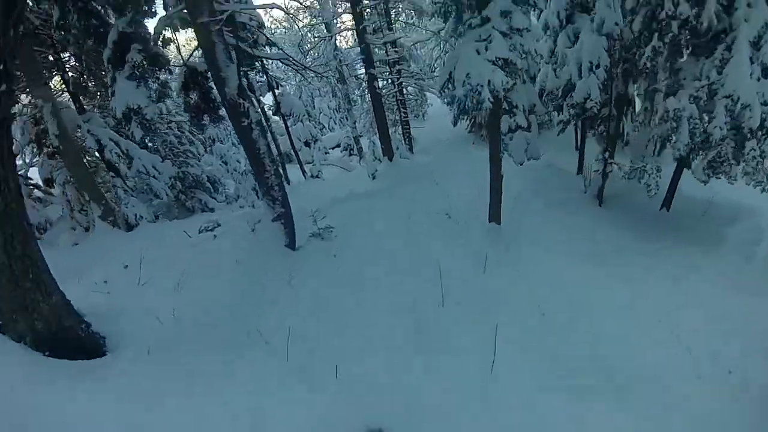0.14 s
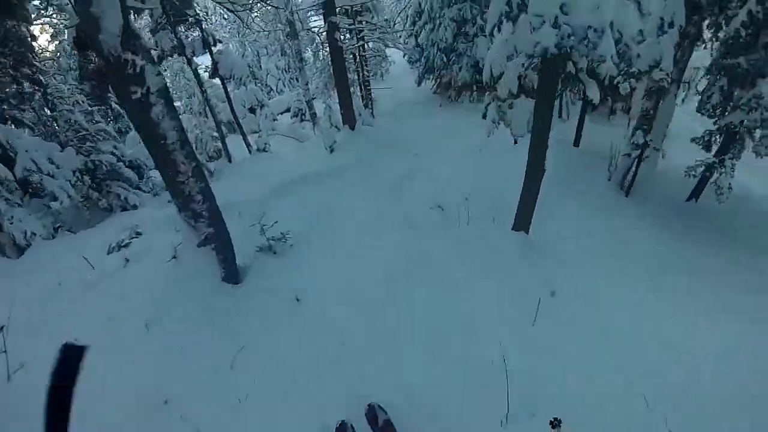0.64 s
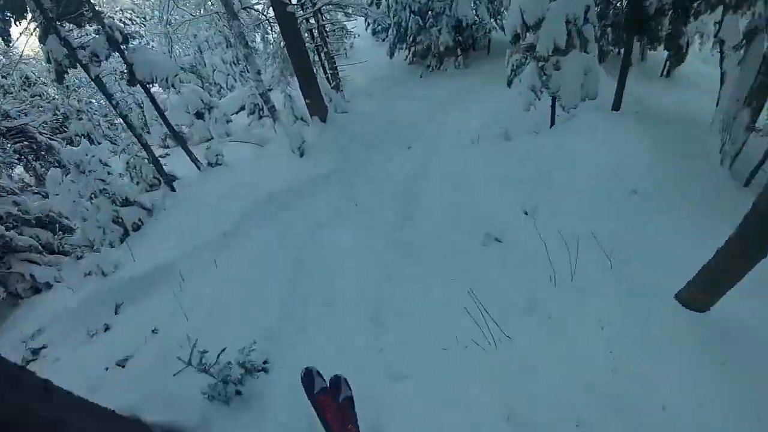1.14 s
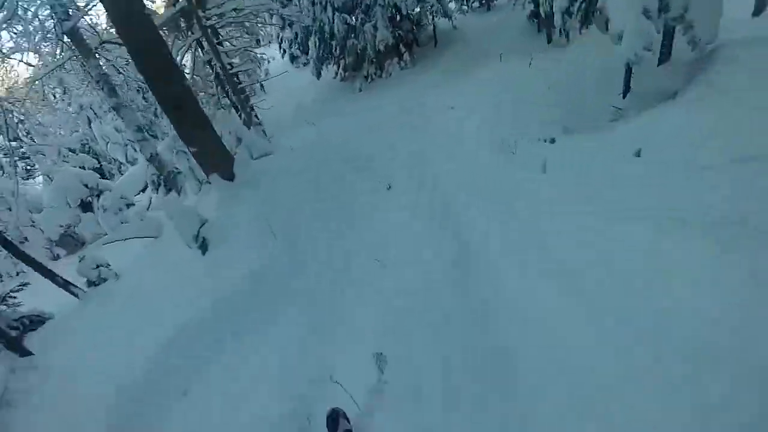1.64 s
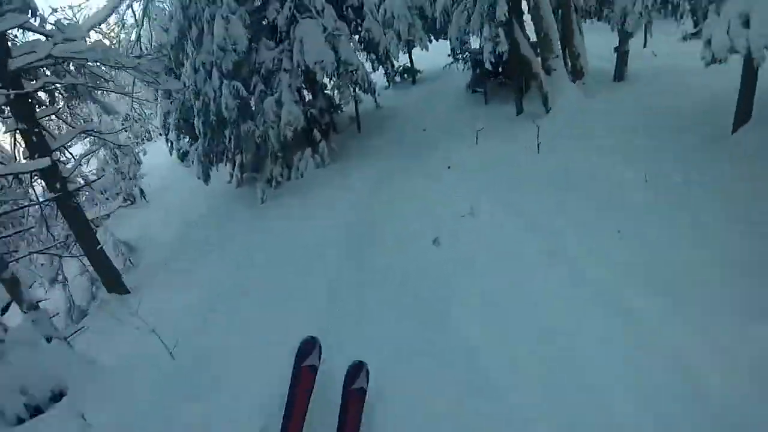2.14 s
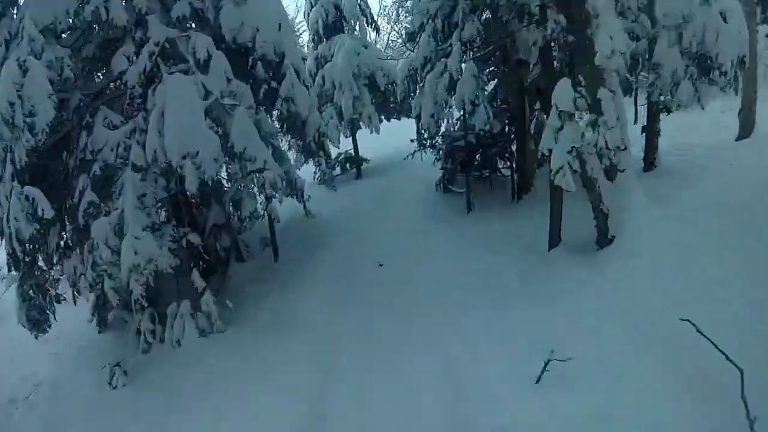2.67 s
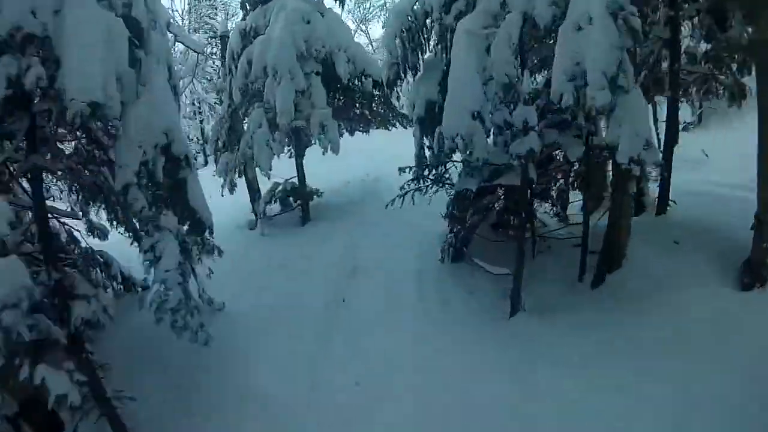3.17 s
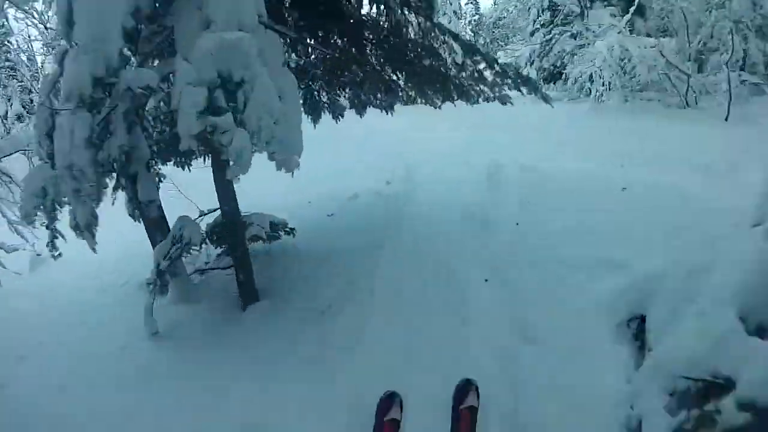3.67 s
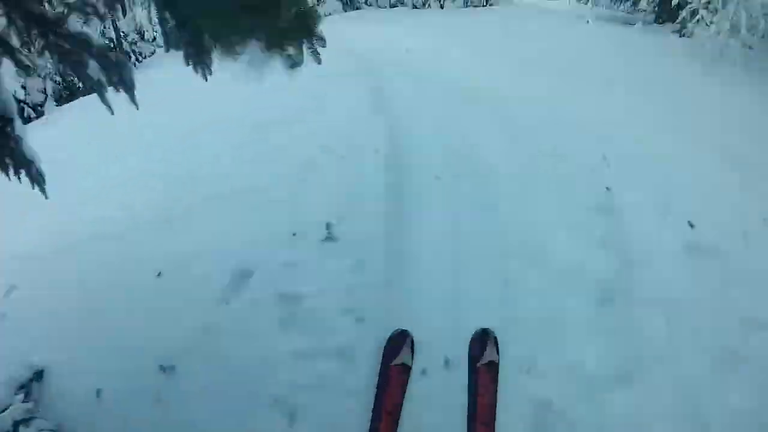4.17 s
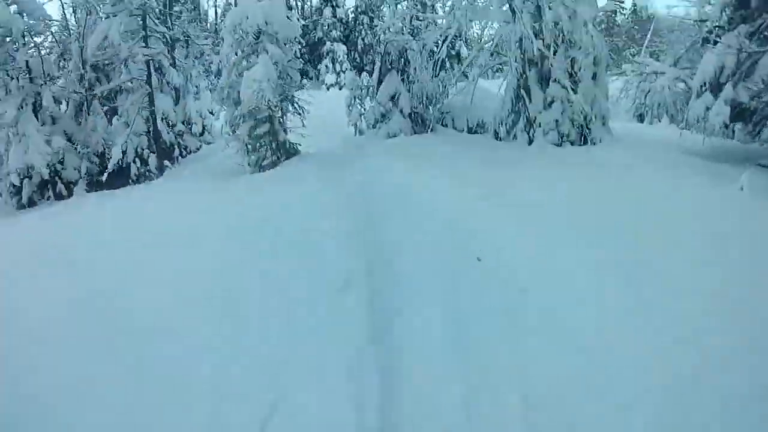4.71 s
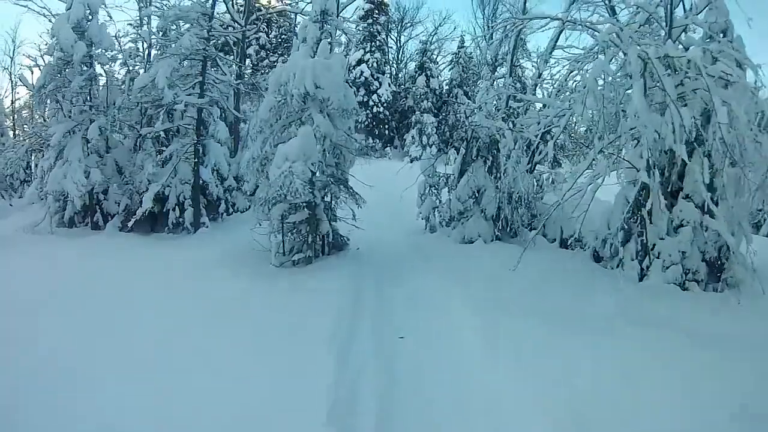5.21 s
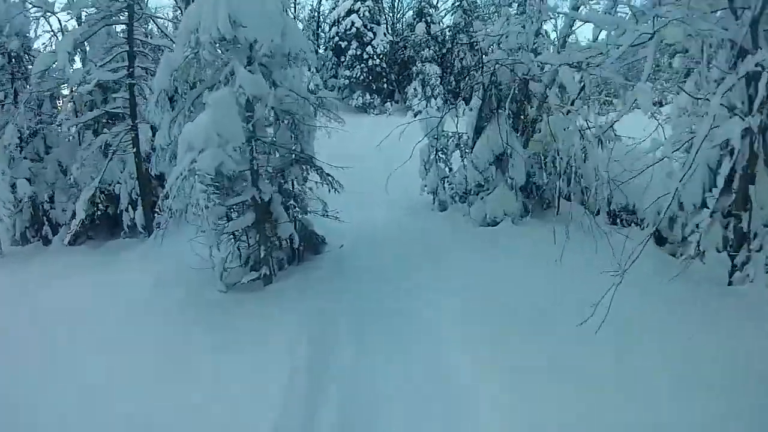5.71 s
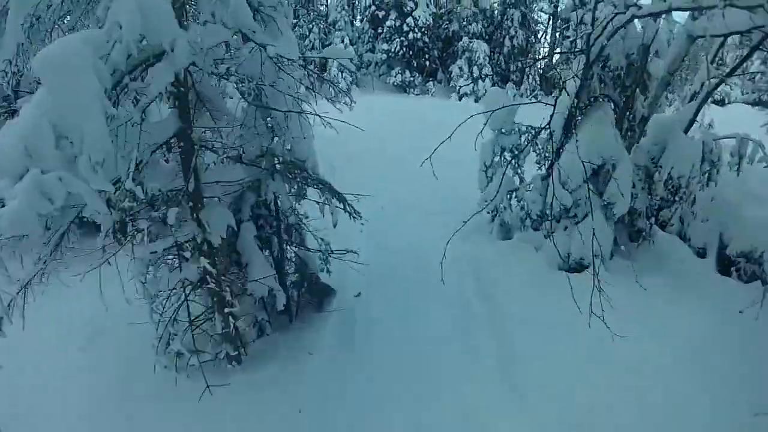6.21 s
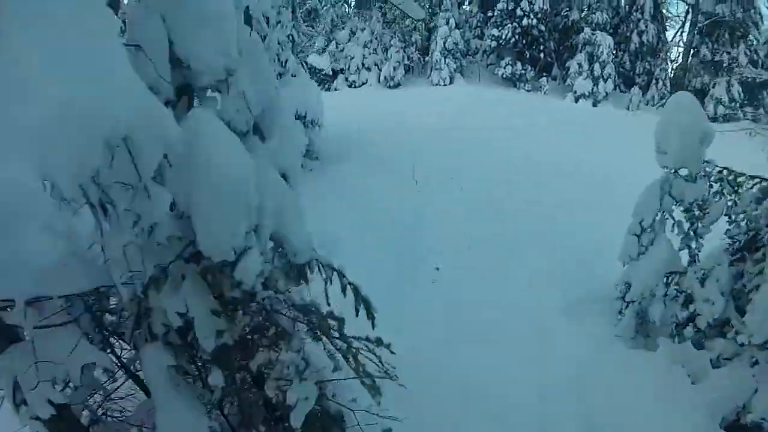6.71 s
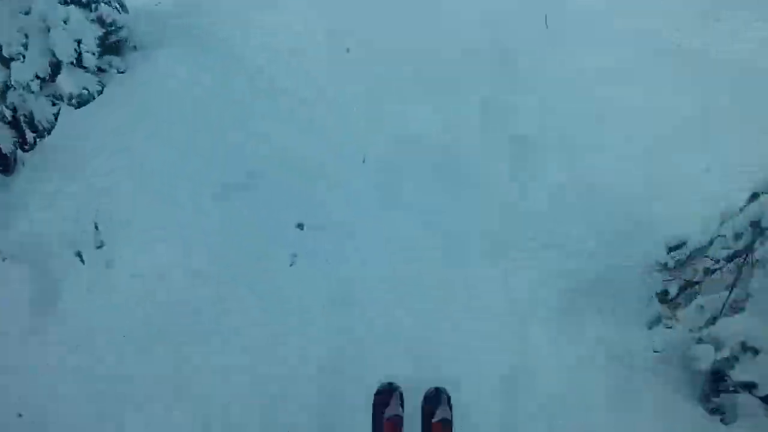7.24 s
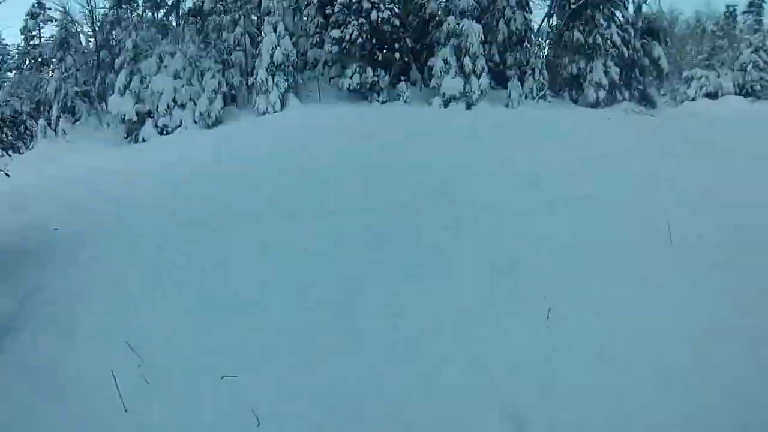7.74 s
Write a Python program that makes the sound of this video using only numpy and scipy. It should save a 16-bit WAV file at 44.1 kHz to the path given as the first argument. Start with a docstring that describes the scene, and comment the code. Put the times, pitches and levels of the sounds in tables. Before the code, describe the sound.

Skis glide through powder with a faint muffled rush, twigs knock and brush a plastic case, then violent cracks and a metallic pole ring burst out.

```python
"""First a muffled rush of powder snow and air, slow pressure swings under it, and twigs brushing past at once.
The place is deep snow between trees, on a gliding skier; the microphone sits in a sealed plastic case on a
springy mount. Shaped noise makes the rush, brushes and swings; bursts through the shell's resonances make the
knocks, each with a push that sets the mount bouncing. Decaying sines make short pitched rings and a metal pole
struck three times; the hard blows overload the inputs."""
import sys
import numpy as np
from scipy import signal
from scipy.io import wavfile
from scipy.ndimage import uniform_filter1d

SR = 44100
rng = np.random.default_rng(int(sys.argv[2]) if len(sys.argv) > 2 else 0)


def file_out(sig):
    """Save sig as 16-bit WAV at sys.argv[1]."""
    # one column per channel
    cols = np.atleast_2d(sig).T
    # limit, then scale
    lim = np.clip(cols, -1, 1)
    pcm = np.round(lim * 32767).astype(np.int16)
    wavfile.write(sys.argv[1], SR, pcm)


def linear_from_db(decibels):
    """Turn decibels (scalar or array-like) into linear amplitude factors; 0 gives 1."""
    return 10 ** (np.asarray(decibels, float) / 20)


N = 346626

# Body of the skier. Each row: time in seconds, slow pressure swing in dB, mount shaking in dB.
BODY_MOTION = [(0.0, -15.5, -52), (0.13, -40, -52), (0.26, -19.5, -55), (0.44, -24.5, -56.5),
               (0.9, -33, -52.5), (1.4, -26.5, -47.5), (1.58, -14.5, -39.5), (1.86, -27.5, -46.5),
               (2.08, -14.5, -37), (2.32, -38, -42.5), (2.54, -26, -46), (2.74, -33.5, -46),
               (3.0, -28, -51), (3.37, -38, -53.5), (3.46, -25, -49.5), (3.59, -40, -51),
               (3.72, -22.5, -52.5), (4.05, -33.5, -52), (5.58, -35.5, -56), (5.95, -29, -52),
               (6.55, -46.5, -57), (6.89, -37, -37), (7.35, -16, -50.5), (7.51, -31.5, -53.5),
               (7.57, -18, -52.5), (7.86, -37.5, -51.5)]
# Skis pressing through powder. Each row: time in seconds, glide in dB (only its change about the mean is used).
SKI_GLIDE = [(0.0, -61.5), (0.68, -66.5), (2.01, -55.5), (3.24, -61.5), (3.59, -54.5), (4.03, -56),
             (4.51, -68), (4.82, -66.5), (5.03, -61.5), (5.39, -68.5), (5.71, -69), (5.84, -60.5),
             (6.19, -67), (6.48, -66.5), (6.67, -64.5), (6.83, -55.5), (7.05, -51), (7.22, -57),
             (7.57, -61.5), (7.86, -62.5)]
# Lower shell ring, upper ring, dull and bright part of the rush. Each row: level in dB at mean glide and shaking,
# share of the glide's swing (dB per dB), share of the shaking's swing (dB per dB).
RUSH_MIX = [(-64.5, 1.1, 0.01), (-66.5, 1.1, 0.01), (-63, 0.42, 0.46), (-69.5, 0.56, 0.01)]
# Lower ring of the plastic shell. Each row: frequency in Hz, width in Hz, level in dB.
SHELL_LOWER_RING = [(1383, 230, 11), (1716, 240, -9)]
# Upper ring of the shell. Each row: frequency in Hz, width in Hz, level in dB.
SHELL_UPPER_RING = [(2041, 200, 12), (2610, 380, -0.5)]
# Thin treble through the shell. Each row: frequency in Hz, width in Hz, level in dB.
SHELL_TREBLE = [(3270, 920, 6), (4700, 2250, 7), (5440, 1400, 9), (6920, 1500, 3.5), (8270, 2600, 1),
                (10940, 1000, -1.5)]
# Cancellations between shell modes. Each row: frequency in Hz, width in Hz, share taken out.
SHELL_CANCELLATIONS = [(1070, 330, 0.3), (3040, 180, 0.38)]
# Place of contact on the shell. Each row: time in seconds, lift of the upper ring in dB.
CONTACT_PLACE = [(0, -2), (1.33, 1), (1.54, -2.5), (1.98, 2), (2.2, 0), (3.67, -5), (3.75, -2), (5.1, -0.1),
                 (5.75, 1.5), (5.9, -8.5), (5.945, 4.5), (6.01, -7), (6.63, -4), (6.66, -4), (6.7, 0.5),
                 (6.82, 1), (6.88, 5), (6.96, 1.5), (7.0, -2.5), (7.03, 0.5), (7.07, -1), (7.1, 3),
                 (7.86, 1.5)]
# Twigs and snow brushing past. Each row: start in seconds, end in seconds, shell level in dB before the swell,
# dull part in dB re shell, treble in dB re shell.
BRUSHES = [(-0.02, 0.08, -45, -3, -17), (0.274, 0.352, -55.5, -7, -12.5), (0.56, 0.616, -67.5, -20, 9),
           (0.81, 0.865, -63.5, 7, -2.5), (1.312, 1.335, -50.5, 0, -6), (1.33, 1.378, -48, -0.5, -10.5),
           (1.399, 1.462, -58.5, 0, -12.5), (1.465, 1.51, -57.5, -3, -1), (1.548, 1.587, -57.5, 8.5, -28),
           (1.762, 1.777, -63, 21, 4), (1.827, 1.881, -53.5, 4.5, -4), (1.986, 2.066, -50.5, 5, -4.5),
           (2.065, 2.105, -71, 25, -22.5), (3.645, 3.67, -54, -2, -12), (3.676, 3.706, -42, 0, -11),
           (3.704, 3.73, -41.5, 0, -12), (3.738, 3.785, -48, 2, -18), (3.997, 4.037, -55.5, -12.5, -26),
           (4.204, 4.228, -23, -12, -0.5), (4.224, 4.246, -30.5, -22, -0.5),
           (4.868, 5.027, -63.5, -10.5, -15.5), (5.776, 5.895, -69, 3.5, -12),
           (5.88, 5.915, -59.5, -11.5, -17), (5.983, 6.047, -55.5, -7.5, -13),
           (6.625, 6.677, -37, -5, -6.5), (6.705, 6.74, -58, 14, -25.5), (6.862, 6.882, -52.5, -10, -14.5),
           (6.88, 6.917, -58, -26, -11.5), (6.942, 6.984, -43.5, 4.5, -14), (6.987, 7.005, -44, -9, -10),
           (7.008, 7.036, -41.5, -9, -8), (7.03, 7.051, -45, -9, -8.5), (7.038, 7.09, -40.5, -2.5, -15),
           (7.155, 7.225, -49.5, -17, -10), (7.251, 7.289, -56, -7, -5.5), (7.472, 7.574, -57.5, -14.5, -9)]
# Smooth sprays of powder. Each row: start in seconds, end in seconds, shell level in dB before the swell,
# dull part in dB re shell, treble in dB re shell.
POWDER_SPRAYS = [(2.138, 2.295, -44, -7.5, -11), (4.386, 4.495, -58, -12.5, -17),
                 (5.038, 5.212, -58, -11.5, -24), (5.67, 5.752, -54, -15.5, -13.5),
                 (6.783, 6.862, -45.5, 2.5, -15)]
# Dragging twigs that keep the mount swinging. Each row: start in seconds, end in seconds, full height in dB.
TWIG_DRAGS = [(3.684, 3.705, -19), (5.829, 5.892, -25.5), (6.643, 6.678, -30.5)]
# Short pitched rings, low to high, many sounding within the knocks and blows. Each row: time in seconds,
# frequency in Hz, height in dB before rise and decay.
SHORT_RINGS = [(0.3, 2100, -37), (1.326, 3900, -41), (1.424, 1470, -36), (1.538, 1850, -34),
               (1.556, 4300, -46), (1.563, 4500, -48), (1.571, 3500, -38), (1.978, 3450, -33),
               (1.979, 4340, -43), (3.675, 3680, -28), (3.675, 1480, -14), (3.708, 1470, -14.5),
               (3.709, 800, -26.5), (3.716, 2000, -30), (3.808, 6900, -46), (3.819, 1510, -42),
               (4.069, 2288, 10.5), (4.0694, 853, -7), (4.0694, 3570, -15), (4.0695, 4700, -5),
               (4.0705, 9620, -8), (4.0696, 8350, -18), (4.0694, 615, -11), (4.192, 5840, -5),
               (4.1922, 8300, -8), (4.2022, 5300, -10), (4.209, 690, -19), (4.191, 900, -17),
               (4.2018, 950, -10), (4.2175, 861, -14), (4.224, 2390, -5.5), (4.081, 1700, -18),
               (4.216, 1500, -1), (4.3689, 1614, -8), (4.3688, 2440, -19.5), (4.3695, 3460, -21.5),
               (4.368, 4520, -23), (4.3696, 920, -30.5), (4.369, 5880, -16), (4.369, 8350, -23),
               (5.3, 6040, -55), (5.754, 3504, -37.5), (5.945, 2048, -37), (6.627, 4196, -32),
               (6.7, 301, -24), (6.712, 250, -24), (6.822, 400, -38), (6.85, 450, -38), (6.7, 9630, -60),
               (6.713, 9530, -60), (6.75, 9600, -57), (6.82, 2100, -35), (6.954, 2050, -26),
               (7.006, 2050, -23), (7.047, 1500, -32), (7.067, 1500, -31)]
# A small hard part of the gear clinks. Each row: time in seconds, height in dB before rise and decay.
GEAR_CLINKS = [(1.572, -38), (1.62, -50), (1.911, -45), (2.064, -35.5), (2.337, -46.5), (3.822, -40.5),
               (4.08, -31)]
# Pitches of a clink. Each row: frequency in Hz, level in dB re the clink.
CLINK_PITCHES = [(6900, 0), (9300, 0)]
# The pole is struck at its tip, then shaft, then grip. Each entry: time in seconds.
POLE_STRIKES = [4.070, 4.202, 4.369]
# Modes of the metal pole. Each row: frequency in Hz, level in dB struck at the tip, in dB at the shaft,
# in dB at the grip, time to fall 60 dB in seconds (before the glove damps it).
POLE_MODES = [(231, -42, -50, -56, 1.1), (1965, -43, -56, -60, 1.0), (2584, -55, -56, -55, .7),
              (2875, -56, -80, -85, .3), (3004, -48, -60, -85, .7), (3951, -62, -64, -64, 1.8),
              (4382, -55, -80, -53, .18), (4592, -41, -85, -75, .2), (4947, -59, -43, -51, .2),
              (5588, -53, -66, -72, .5), (5970, -65, -80, -62, .2)]
# Twig knocks, levels before the drives in scene(). Each row: time in seconds, crack in dB, mount jolt in dB,
# thud in dB, hardness as treble in dB re crack.
TWIG_KNOCKS = [(0.279, -66, -33.5, -52.5, -13), (1.0993, -70, -45, -55.5, -16),
               (1.3247, -34, -29.5, -59, -29), (1.4398, -48, -23, -36, -15), (1.481, -49.5, -38, -55.5, -9),
               (1.5354, -36.5, -55, -38.5, -23), (1.5693, -28.5, -40, -38, -11.5),
               (1.555, -40, -57, -50, -31), (1.5883, -61, -52, -37.5, -15), (1.6, -56, -55, -39, -17),
               (1.647, -46, -25, -51, -19), (1.858, -47.5, -32.5, -61, -11),
               (1.9768, -21, -17.5, -31.5, -21.5), (2.0475, -48.5, -30, -40.5, 1),
               (2.066, -54, -53, -39, 2), (2.0715, -67, -27, -43, -12), (2.086, -64, -37, -46, 4.5),
               (2.54, -48.5, -40.5, -74, -14.5), (3.674, -26, -24, -31.5, -24),
               (3.7041, -47, -20.5, -47, -20), (3.7085, -22, -44, -39, -23), (3.8177, -48, -41, -73, -13),
               (5.0548, -44, -65.5, -59.5, -22), (5.752, -25.5, -27.5, -35, -21.5),
               (5.7896, -49, -34, -59, -12), (6.6244, -18, -37.5, -27, -20), (6.636, -26, -29, -37, -35),
               (6.6953, -33, -37.5, -30.5, -32), (6.702, -30.5, -40, -37, -19),
               (6.7183, -52, -35.5, -37, -20), (6.747, -39.5, -35.5, -49, -38), (6.819, -46, -42, -37, -14),
               (6.8468, -43, -37, -58, -13), (6.928, -38, -35.5, -46, -21),
               (6.9519, -38.5, -27.5, -37, -20), (6.969, -32.5, -36, -47, -28),
               (6.9943, -46, -29, -46, -23), (7.009, -25, -29, -63, -28), (7.047, -37, -52, -58, -28),
               (7.0527, -20.5, -17.5, -57, -25), (7.0931, -26.5, -22.5, -34, -21.5),
               (7.167, -40.5, -41, -57, -11), (7.179, -46, -42, -45, -14)]
# Hard blows on the shell, levels before the drives in scene(). Each row: time in seconds, crack in dB,
# mount jolt in dB, thud in dB, upper shell ring in dB re crack.
HARD_BLOWS = [(4.069, -16.5, -21, -20.5, 7), (4.081, -32, -30.5, -56, 0), (4.189, -24, -40, -44, 1),
              (4.1914, -8, -26.5, -26.5, 2), (4.2008, 5, -25, -13.5, -1.5), (4.209, -12.5, -22, -26, 3.5),
              (4.2124, -13.5, -31, -23.5, 2.5), (4.2162, -9, -18.5, -15.5, -5.5),
              (4.2227, -15, -17.5, -24, 3), (4.3687, -20.5, -51, -47.5, -6)]

SWING_LOW_HZ, SWING_HIGH_HZ = 4, 20
MOUNT_HZ, MOUNT_T60_S = 103.2, 0.13
RUSH_TOP_HZ = 8200   # the bright part of the steady rush fades above this
RING_WANDER_DB = 1   # slow change of each ring's share of the rush
BRUSH_SWELL, BRUSH_HOLD, BRUSH_FADE = 0.24, 0.68, 0.71   # shares of the length of a brush
BRUSH_UPPER_DB = 4.5   # brushing favours the upper shell ring
DRAG_START_SHARE = 0.45   # height early in a drag; full from the middle on
SHORT_RING_T60_S = 0.011
CRACK_RISE_S = 0.00093   # straight rise of cracks and short rings
POLE_HELD_S, POLE_HELD_T60_S = 4.47, 0.45   # the glove closes on the pole and damps it
POLE_WAVER_DB = 2.0
UPPER_RING_DB, UPPER_PER_HARDNESS = 3, 0.082   # upper ring of a knock re crack; harder knocks favour it
BLOW_TREBLE_DB, BLOW_TREBLE_SHARE = -4, 0.55   # treble of a blow re crack, rising with the upper ring
RATTLE_T60_S, RATTLE_SPREAD = 0.014, 0.43   # median rattle of a knock; random spread of its logarithm
HISS_DB = -69   # each input's own noise, before its band filter
# level where the gain control starts, dB taken off per dB above it, and its memory
GAIN_FROM_DB, GAIN_SHARE, GAIN_MEMORY_S = -38.5, 0.035, 0.053
TOP_HZ = 11980   # stopband edge of the inputs' low-pass


def rms_one(x):
    """Scales a signal to rms 1."""
    return x / np.sqrt(np.mean(x ** 2) + 1e-20)


def in_time(rows):
    """One sample-rate curve per column after the time."""
    s, *columns = np.transpose(rows)
    return [np.interp(np.arange(N) / SR, s, c) for c in columns]


def drift(rate_hz):
    """Slow chance of spread 1: noise through two equal poles, made at every 40th sample."""
    r = np.exp(-80 * np.pi * rate_hz / SR)
    slow = signal.lfilter([1], [1, -2 * r, r * r], rng.standard_normal(N // 40 + 2002))[2000:]
    return np.interp(np.arange(N) / 40, np.arange(len(slow)), rms_one(slow))


def low_pass(x, order, hz):
    """Butterworth low-pass."""
    return signal.sosfilt(signal.butter(order, hz, fs=SR, output="sos"), x)


def band(x, low_hz, high_hz, order=2):
    """Butterworth band-pass."""
    return signal.sosfilt(signal.butter(order, [low_hz, high_hz], "band", fs=SR, output="sos"), x + 1e-18)


def ring(clicks, hz, t60):
    """A unit click sets a decaying sine of starting height 1 ringing."""
    r, w = linear_from_db(-60 / (t60 * SR)), 2 * np.pi * hz / SR
    return signal.lfilter([0, np.sin(w)], [1, -2 * r * np.cos(w), r * r], clicks + 1e-18)


def resonances(x, table):
    """Parallel resonances with alternating signs."""
    x = x + np.full(1, 1e-18)   # also lets a plain 0 stand for silence
    out = 0
    for k, (hz, width, db) in enumerate(table):
        r = np.exp(-np.pi * width / SR)
        b = np.array([1, 0, -1]) * (1 - r * r) / 2
        a = [1, -2 * r * np.cos(2 * np.pi * hz / SR), r * r]
        out = out + (-1) ** k * linear_from_db(db) * signal.lfilter(b, a, x)
    return out


def through_shell(low, high):
    """Two groups of resonances in opposite sign; the shell passes little below its first resonance."""
    rings = resonances(low, SHELL_LOWER_RING) - resonances(high, SHELL_UPPER_RING)
    return band(rings, 1180, 4200, order=3)


def dips(x):
    """Narrow cancellations between shell modes."""
    for hz, width, share in SHELL_CANCELLATIONS:
        x = x - share * resonances(x, [(hz, width, 0)])
    return x


def heard_parts(grains_per_s, grain_db, flicker_db, flicker_rate_hz):
    """Noise with scattered harder grains, as lower ring, upper ring, dull and bright parts of rms 1."""
    sizes = linear_from_db(3.5 * np.minimum(rng.exponential(1, N), 4)) * rng.choice([-1, 1], N)
    grains = linear_from_db(grain_db) * rms_one(sizes * (rng.random(N) < grains_per_s / SR))
    low, high, dull, bright = rng.standard_normal((4, N)) * linear_from_db(flicker_db * drift(flicker_rate_hz))
    # each ring also flickers on its own
    low = (low + grains) * linear_from_db(flicker_db * drift(18))
    high = (high + grains) * linear_from_db(flicker_db * drift(9.4))
    dull = band(dull * linear_from_db(2.0 * drift(30)), 87, 1500)
    dull = signal.lfilter([1], [1, -0.96], dull)   # tilts the dull part towards the bass
    parts = through_shell(low, 0), through_shell(0, high), dull, resonances(bright + grains, SHELL_TREBLE)
    return [rms_one(dips(p)) for p in parts]


def swing(level_db):
    """Gusts and body motion pump the air in the case, mostly below hearing, in waves of fairly even height."""
    x = band(rng.standard_normal(N + SR), SWING_LOW_HZ, SWING_HIGH_HZ, order=3)[SR:]
    x = x / np.sqrt(uniform_filter1d(x ** 2, size=SR // 6) + 1e-12)
    return linear_from_db(level_db) * rms_one(x)


def rush(shake_db):
    """Fine powder and air stream past the case; pressure on the skis and shaking drive all parts."""
    glide_db, = in_time(SKI_GLIDE)
    parts = heard_parts(grains_per_s=190, grain_db=-8.0, flicker_db=1.28, flicker_rate_hz=5.7)
    parts[:2] = [p * linear_from_db(RING_WANDER_DB * drift(1.2)) for p in parts[:2]]
    parts[3] = low_pass(parts[3], 2, RUSH_TOP_HZ)
    glide_db = glide_db - glide_db.mean()
    shake_db = shake_db - shake_db.mean()
    out = np.zeros(N)
    for (db, by_glide, by_shake), part in zip(RUSH_MIX, parts):
        out += linear_from_db(db + by_glide * glide_db + by_shake * shake_db) * part
    return out


def mount_shake(level_db, lumpy_db, skirt_db):
    """Uneven snow shakes the mount in lumps around its resonance."""
    push = rng.standard_normal(N) * linear_from_db(lumpy_db * drift(42))
    resonant = rms_one(ring(band(push, 57, 250), MOUNT_HZ, MOUNT_T60_S))
    skirt = linear_from_db(skirt_db) * rms_one(band(push, 36, 160))
    return linear_from_db(level_db) * rms_one(resonant + skirt)


def scrapes(table, grain_db, flicker_db):
    """Each brush of grainy noise on the shell swells, holds while growing slightly louder, then fades."""
    t, gains = np.arange(N) / SR, np.zeros((4, N))
    for start, end, db, dull_db, treble_db in table:
        length = end + 0.0017 - start
        corners = start + length * np.array([0, BRUSH_SWELL, BRUSH_HOLD, BRUSH_FADE, 1])
        shape = np.interp(t, corners, [0.00014, 0.62, 0.67, 0.77, 0.0015])
        gains += linear_from_db(db + np.array([[0], [BRUSH_UPPER_DB], [dull_db], [treble_db]])) * shape
    gains[1] *= linear_from_db(in_time(CONTACT_PLACE)[0])
    parts = heard_parts(grains_per_s=420, grain_db=grain_db, flicker_db=flicker_db, flicker_rate_hz=40)
    return (gains * parts).sum(axis=0)


def drags():
    """The mount keeps swinging at its own pitch while a twig drags, and stops when it lets go."""
    t, out = np.arange(N) / SR, np.zeros(N)
    for start, end, db in TWIG_DRAGS:
        corners = [start, start + 0.0038, (start + end) / 2, end - 0.01, end]
        shape = np.interp(t, corners, [0, DRAG_START_SHARE, 1, 1, 0])
        out += linear_from_db(db) * shape * np.sin(2 * np.pi * MOUNT_HZ * (t - start))
    return out


def short_rings():
    """Each short ring is a decaying sine on one pitch, each clink on two."""
    t, out = np.arange(SR // 20) / SR, np.zeros(N)
    clinks = [(s, hz, db + part_db) for s, db in GEAR_CLINKS for hz, part_db in CLINK_PITCHES]
    rise = np.minimum(t / CRACK_RISE_S, 1)
    for s, hz, db in SHORT_RINGS + clinks:
        i = round(s * SR)
        out[i:i + len(t)] += linear_from_db(db - 60 * t / SHORT_RING_T60_S) * rise * np.sin(2 * np.pi * hz * t)
    return out


def pole():
    """Each strike stops the earlier ringing and leaves thin metal modes set by the place struck."""
    t, out = np.arange(N) / SR, np.zeros(N)
    stops = POLE_STRIKES[1:] + [N / SR]
    for place, (start, stop) in enumerate(zip(POLE_STRIKES, stops)):
        on = (t >= start) & (t < stop)
        since = t[on] - start
        for hz, *levels_db, t60 in POLE_MODES:
            out[on] += linear_from_db(levels_db[place] - 60 * since / t60) * np.sin(2 * np.pi * hz * since)
    glove_db = -60 * np.maximum(t - POLE_HELD_S, 0) / POLE_HELD_T60_S
    return out * linear_from_db(glove_db + POLE_WAVER_DB * drift(12))


def knocks(tail_db, crack_drive_db, thud_drive_db, jolt_drive_db, hollow_db):
    """Each knock is a sharp crack with a rattling tail in the shell, a dull thud, and a push that bounces the mount."""
    low, high, top, thud, jolt = np.zeros((5, N + SR))
    t = np.arange(SR // 4) / SR
    hits = []
    for *row, hardness in TWIG_KNOCKS:
        contact_db = np.interp(row[0], *np.transpose(CONTACT_PLACE))
        hits.append((*row, hardness, UPPER_RING_DB + UPPER_PER_HARDNESS * hardness + contact_db))
    for *row, upper_db in HARD_BLOWS:
        hits.append((*row, BLOW_TREBLE_DB + BLOW_TREBLE_SHARE * upper_db, upper_db))

    noise = rng.standard_normal((len(hits), len(t) + 1))
    for (s, crack_db, jolt_db, thud_db, treble_db, upper_db), draws in zip(hits, noise):
        i, chance, grit = round(s * SR), draws[0], draws[1:]
        t60 = RATTLE_T60_S * np.exp(RATTLE_SPREAD * chance)
        crack = np.sign(grit) * linear_from_db(-60 * t / t60)
        tail = linear_from_db(tail_db) * grit * linear_from_db(-60 * t / (3 * t60))
        burst = (crack + tail) * np.minimum(t / CRACK_RISE_S, 1)
        here = slice(i, i + len(t))
        low[here] += linear_from_db(crack_db) * burst
        high[here] += linear_from_db(crack_db + upper_db) * burst
        top[here] += linear_from_db(crack_db + treble_db) * burst
        thud[here] += linear_from_db(thud_db) * grit * linear_from_db(-60 * t / 0.038)
        jolt[i] += linear_from_db(jolt_db)

    # the push is soft: little above a few hundred hertz
    push = low_pass(jolt + 1e-18, 3, 400)
    bounce = linear_from_db(jolt_drive_db) * ring(push, MOUNT_HZ, MOUNT_T60_S)
    # the hollow part grows faster than the blow
    hollow = linear_from_db(hollow_db) * band(low * np.abs(low) ** 0.5, 680, 1150)
    shell = linear_from_db(crack_drive_db) * (through_shell(low, high) + resonances(top, SHELL_TREBLE) + hollow)
    return (bounce + shell + linear_from_db(thud_drive_db) * band(thud, 100, 520))[:N]


def scene():
    """All that reaches the microphone in the case, the same for both inputs."""
    swing_db, shake_db = in_time(BODY_MOTION)
    case = swing(swing_db) + mount_shake(shake_db, lumpy_db=2.5, skirt_db=-8.0) + rush(shake_db)
    case = case + pole() + drags() + short_rings()
    case = case + scrapes(BRUSHES, grain_db=-6.5, flicker_db=3.5)
    case = case + scrapes(POWDER_SPRAYS, grain_db=-20, flicker_db=1)
    case = case + knocks(tail_db=-22.5, crack_drive_db=9.5, thud_drive_db=18.5, jolt_drive_db=10.0, hollow_db=2.5)
    return np.array([case, case])


def top_cut(x):
    """Nothing passes above the cut-off."""
    return signal.sosfilt(signal.butter(12, 15700, fs=SR, output="sos"), x)


def record(dry):
    """One microphone feeds two inputs with their own hiss; gain sinks after loud blows, which also overload."""
    x = dry + linear_from_db(HISS_DB) * band(rng.standard_normal((2, N)), 2300, 8000)
    # gain control follows the smoothed power of the first input and turns both down
    r = np.exp(-1 / (GAIN_MEMORY_S * SR))
    power = np.minimum(band(x[0], 230, 8000) ** 2, 1)
    power = signal.lfilter([1 - r], [1, -r], power)
    over_db = np.maximum(10 * np.log10(power + 1e-12) - GAIN_FROM_DB, 0)
    x = x * linear_from_db(-GAIN_SHARE * over_db)
    overloaded = np.clip(x, -1.05, 1.05)
    x = signal.sosfilt(signal.cheby2(10, 50, TOP_HZ, fs=SR, output="sos"), overloaded)
    return top_cut(np.clip(x, -1, 1))


dry = scene()
out = record(dry)
file_out(out)
```